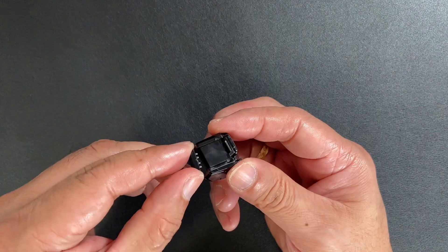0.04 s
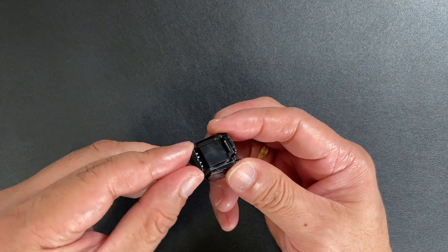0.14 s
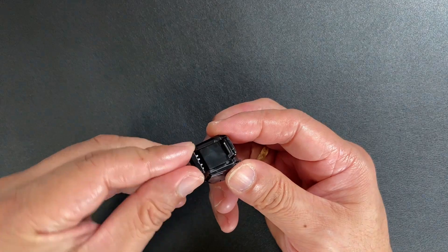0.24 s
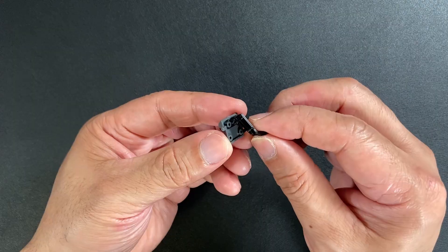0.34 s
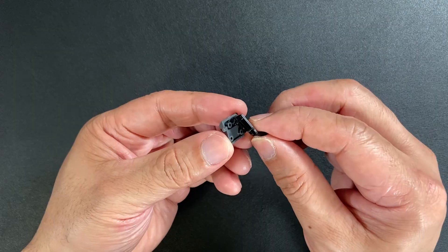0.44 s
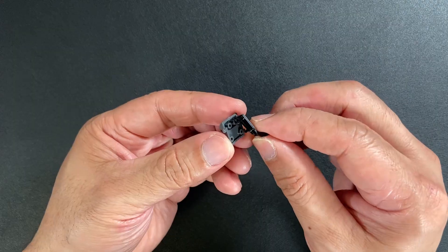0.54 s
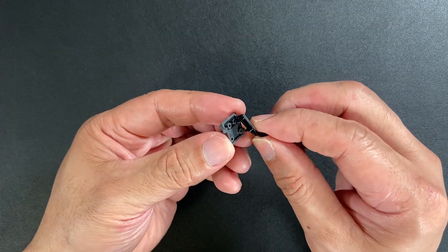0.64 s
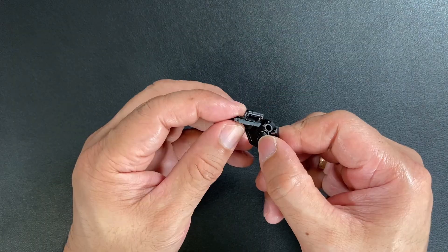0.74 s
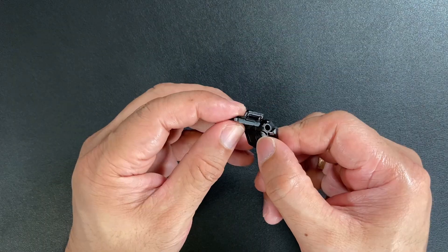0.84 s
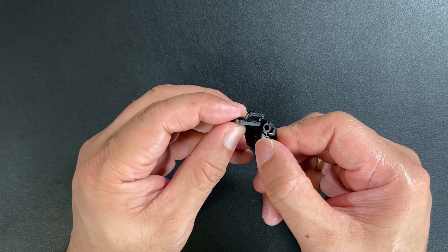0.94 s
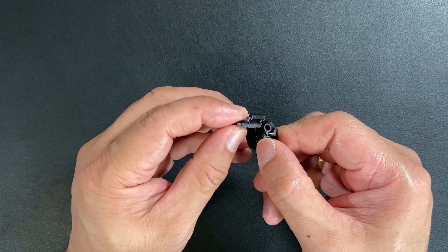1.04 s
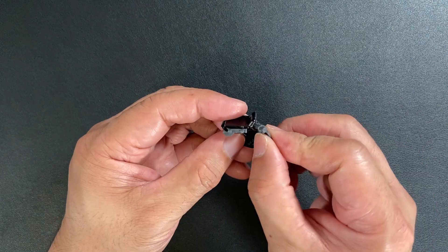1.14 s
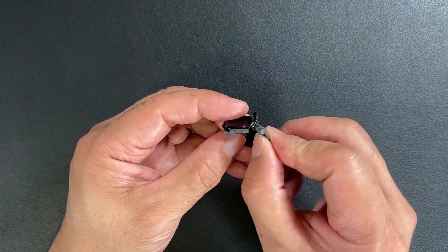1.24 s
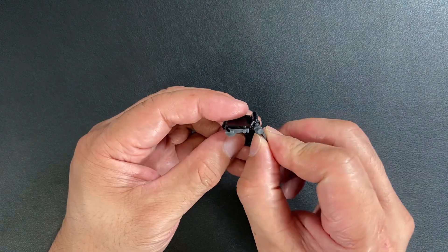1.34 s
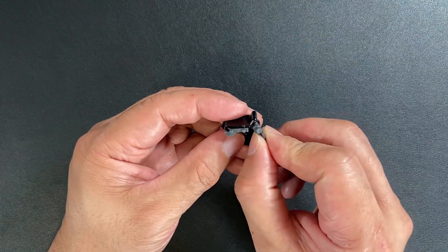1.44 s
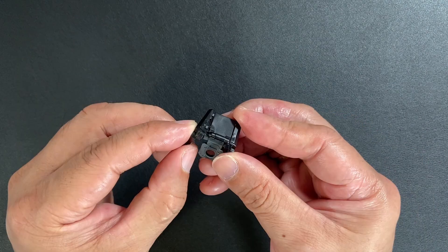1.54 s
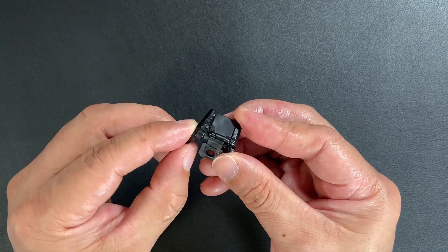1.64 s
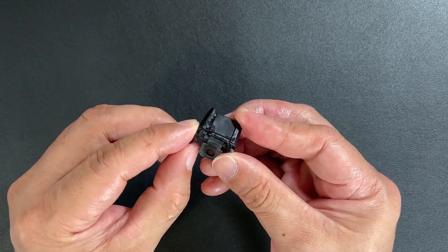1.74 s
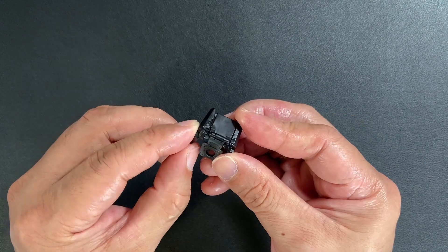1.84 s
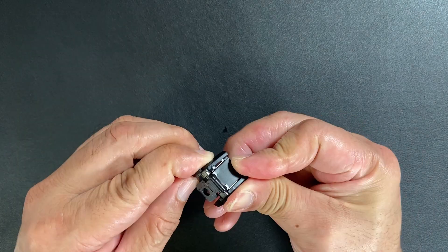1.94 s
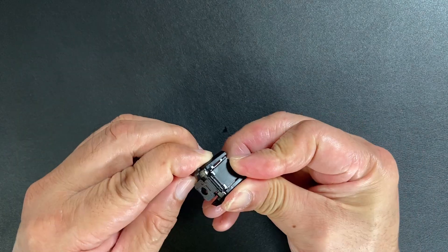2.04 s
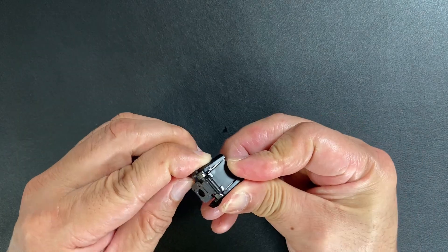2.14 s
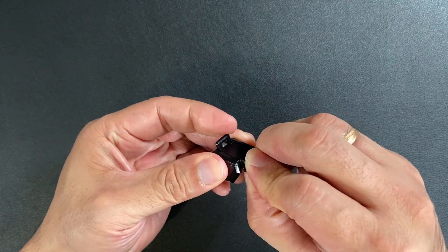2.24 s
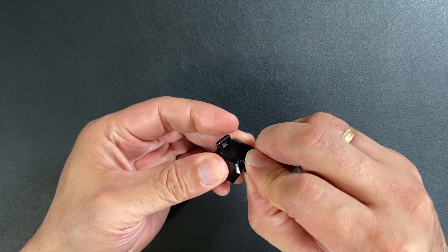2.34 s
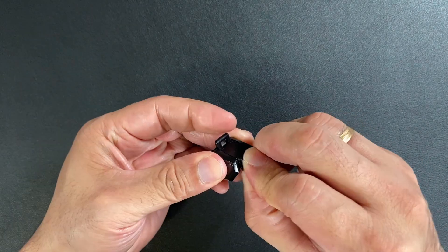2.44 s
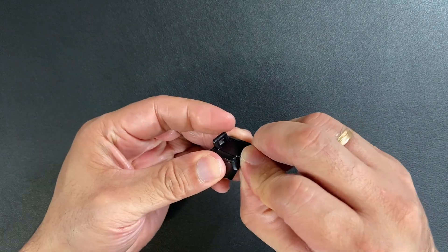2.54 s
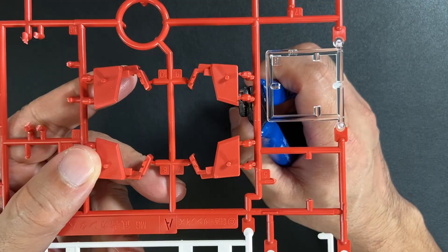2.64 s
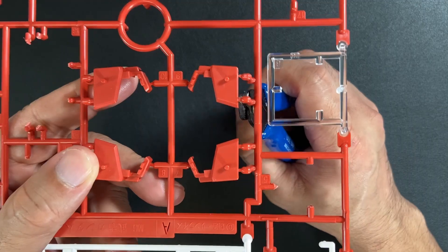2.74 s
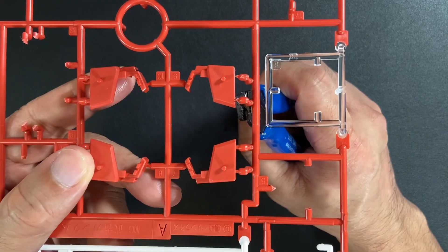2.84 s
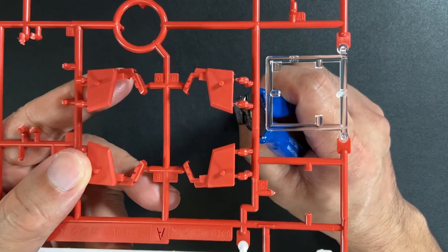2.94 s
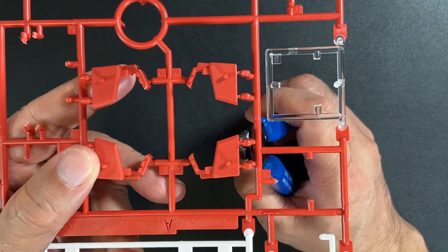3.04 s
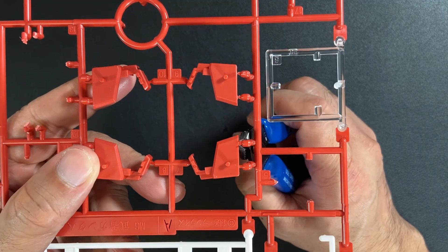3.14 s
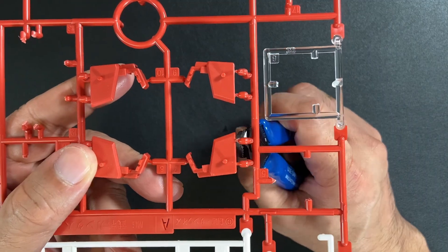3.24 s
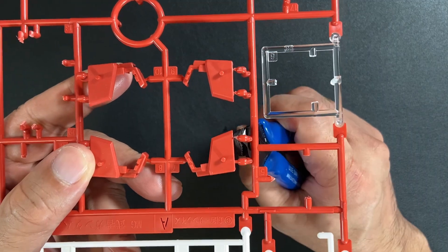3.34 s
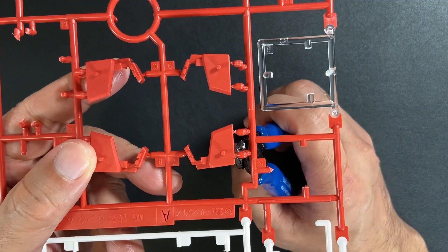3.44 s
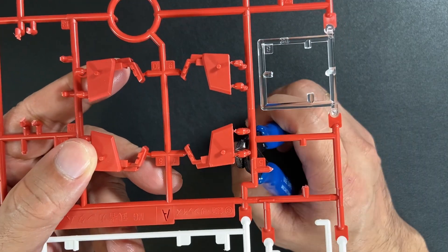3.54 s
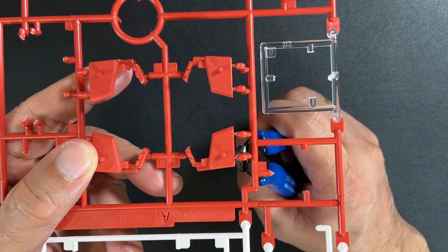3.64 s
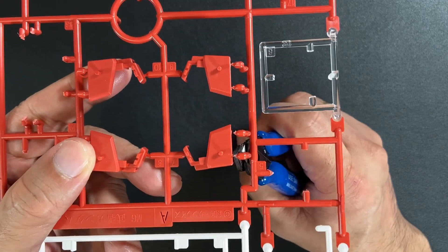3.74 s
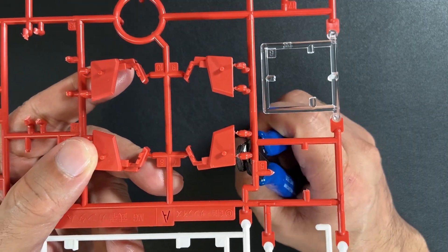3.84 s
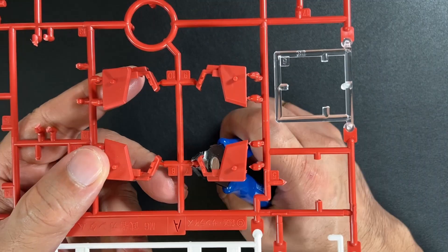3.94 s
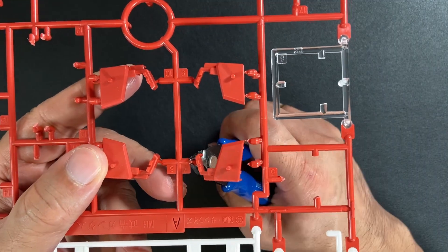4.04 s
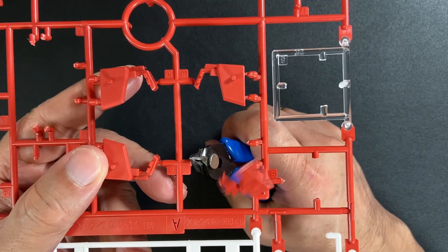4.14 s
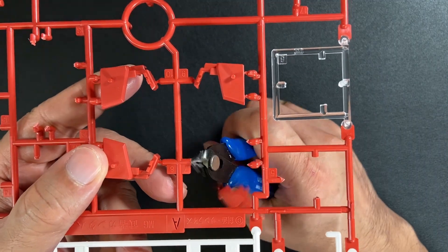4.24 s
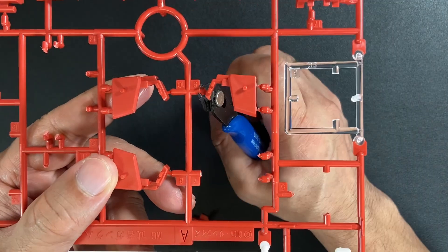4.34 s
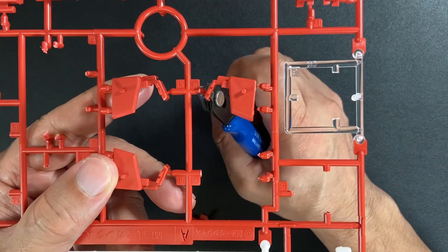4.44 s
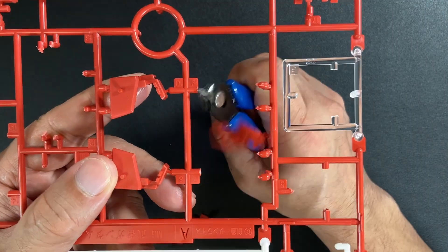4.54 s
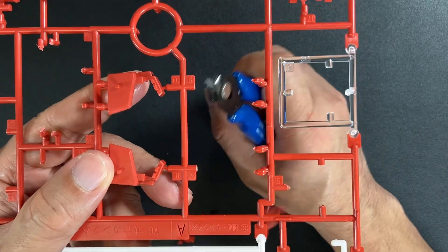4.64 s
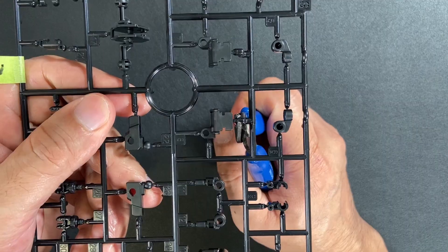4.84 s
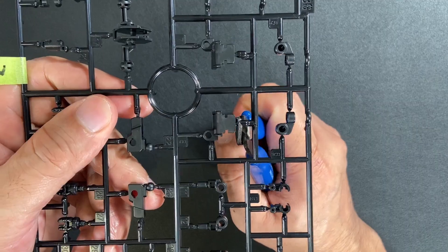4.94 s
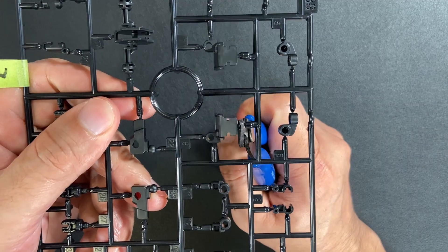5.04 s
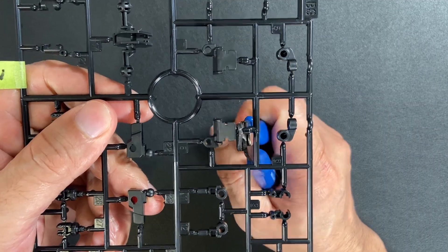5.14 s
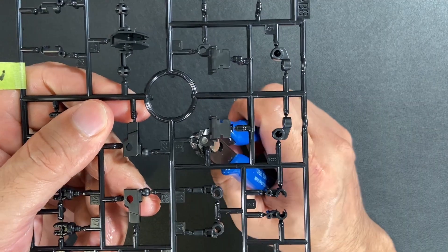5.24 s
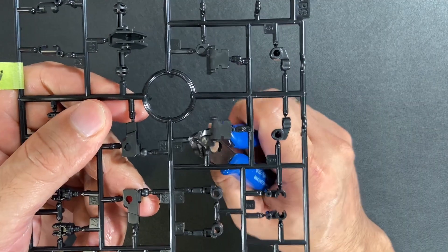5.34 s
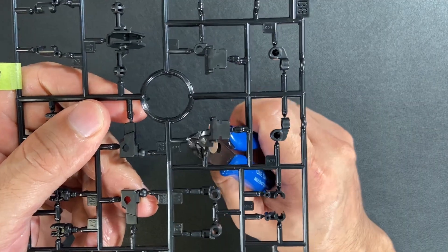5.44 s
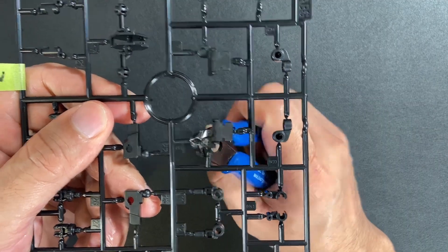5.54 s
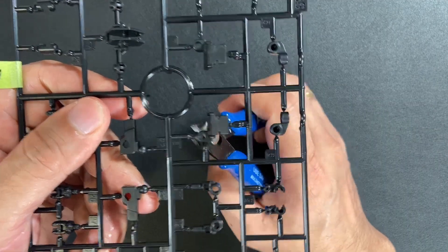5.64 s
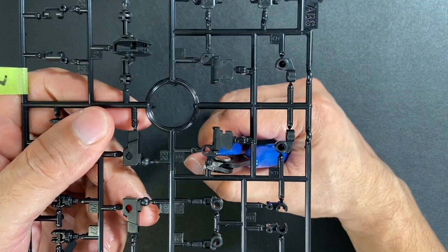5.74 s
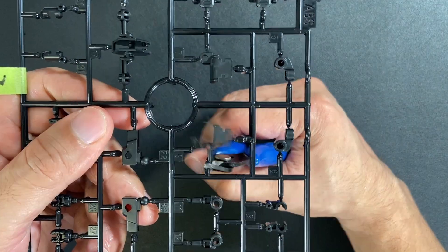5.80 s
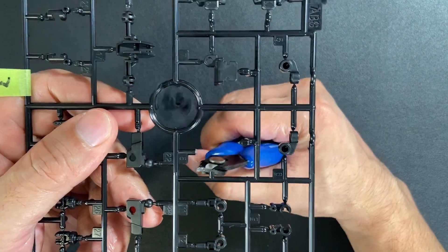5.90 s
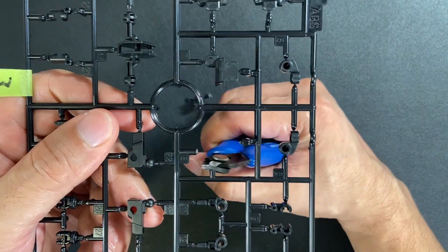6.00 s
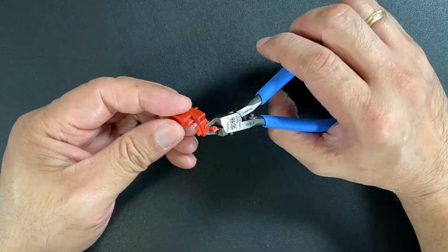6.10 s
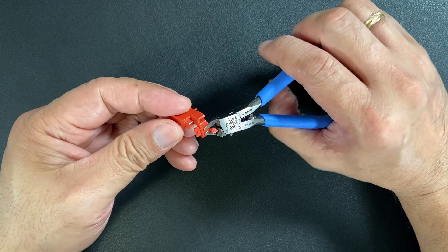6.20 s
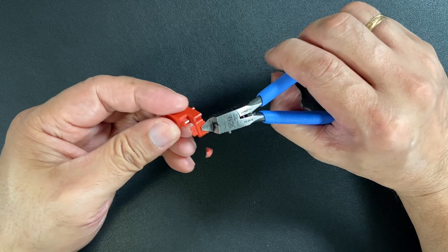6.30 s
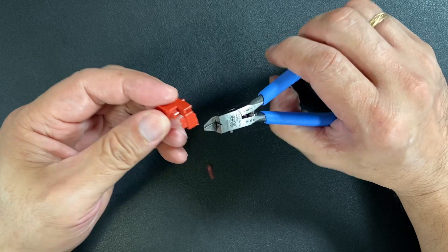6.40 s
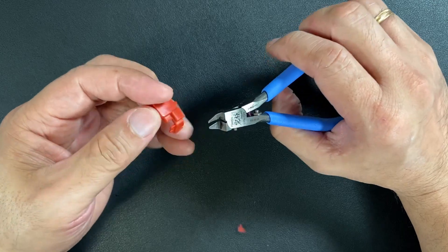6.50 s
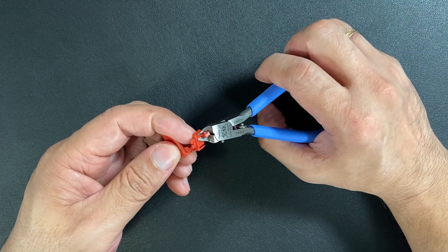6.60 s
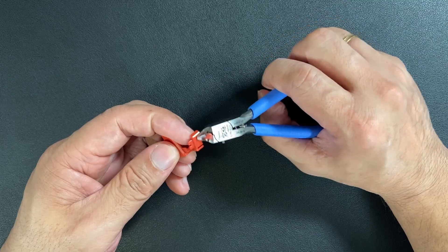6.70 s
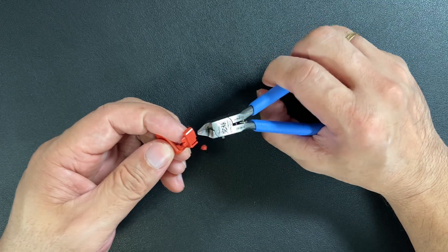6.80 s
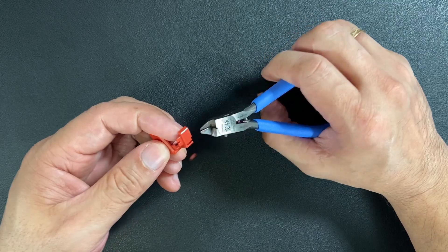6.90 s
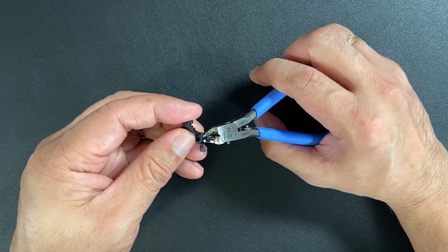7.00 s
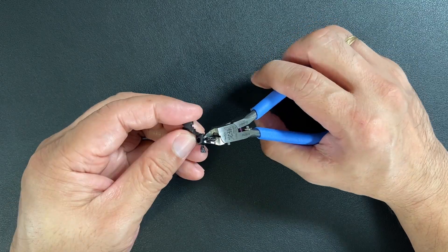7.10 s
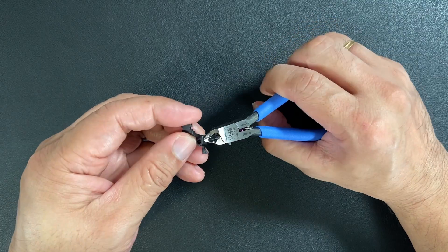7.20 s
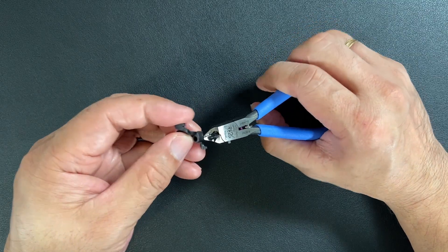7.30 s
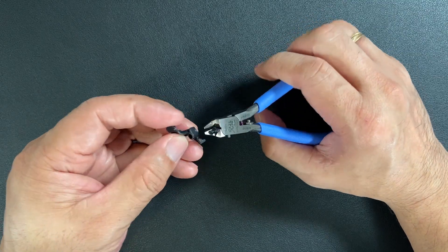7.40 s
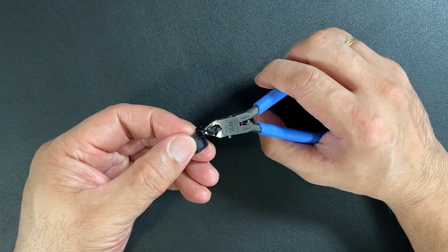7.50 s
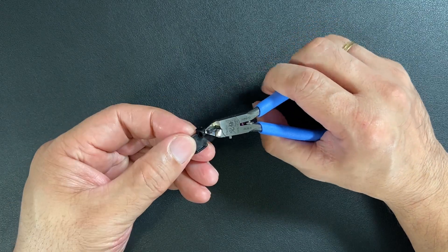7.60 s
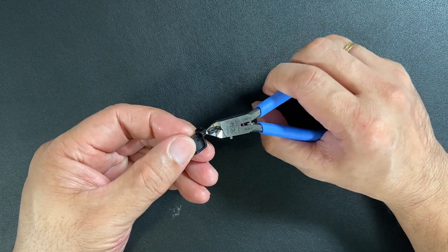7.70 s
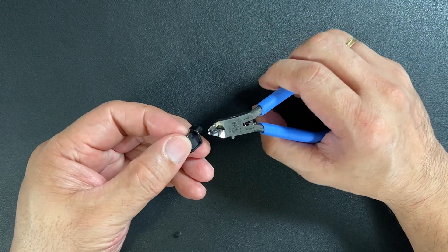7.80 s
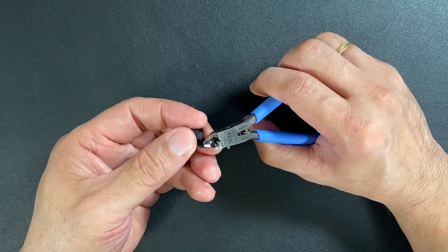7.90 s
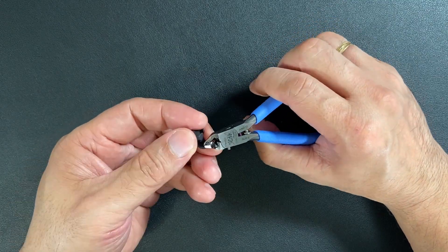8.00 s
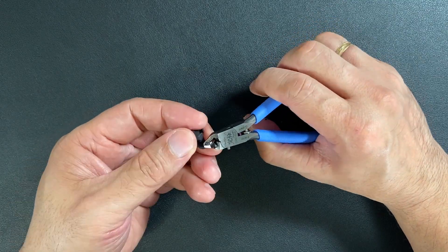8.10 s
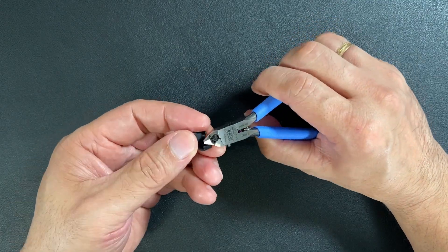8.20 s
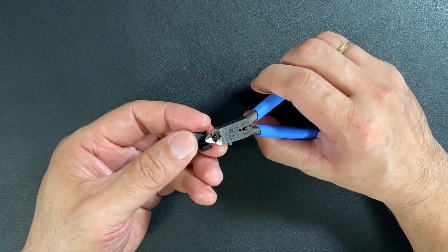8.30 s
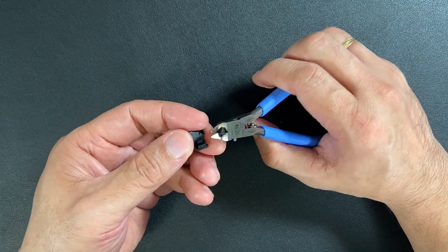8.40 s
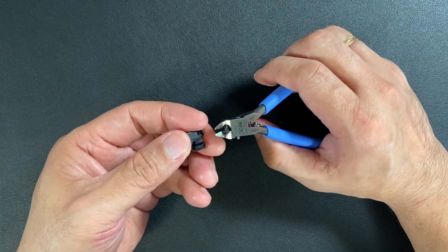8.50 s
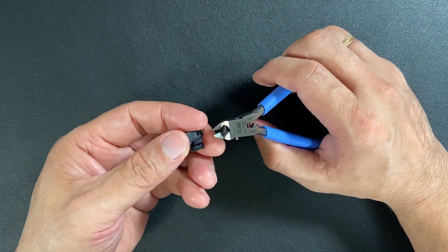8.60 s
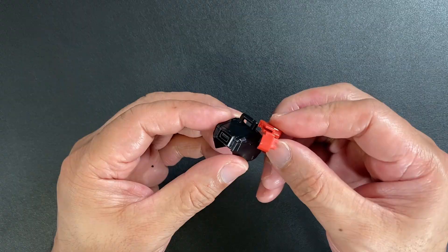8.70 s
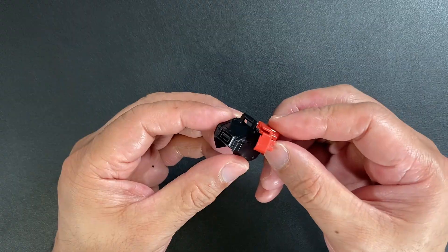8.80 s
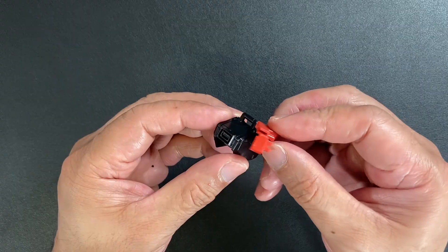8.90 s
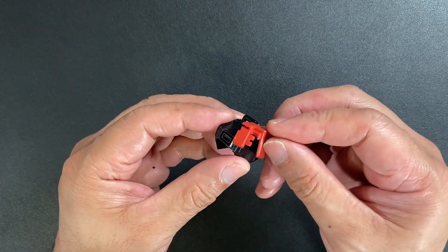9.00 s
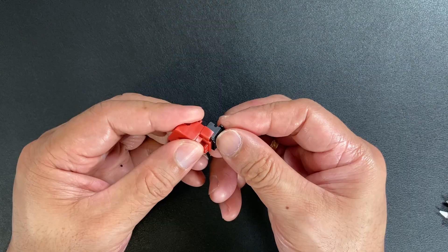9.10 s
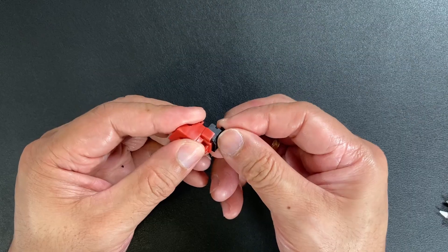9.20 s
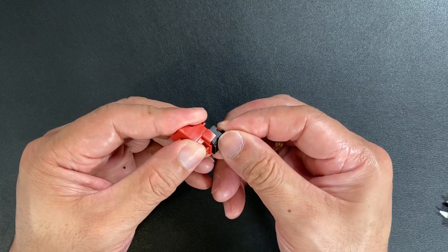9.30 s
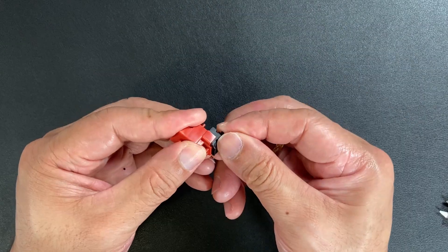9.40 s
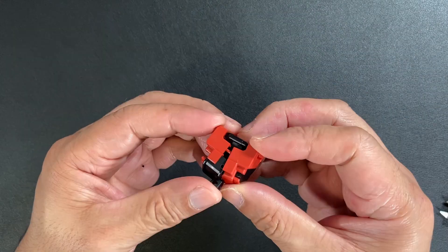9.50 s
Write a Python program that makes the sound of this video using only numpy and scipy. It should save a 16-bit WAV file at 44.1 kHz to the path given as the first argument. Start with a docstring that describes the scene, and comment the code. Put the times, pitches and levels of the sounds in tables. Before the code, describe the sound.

A close microphone at a desk in a quiet room with faint hum and low rumble; a soft low rush stops abruptly at 0.3 s. Small plastic parts click faintly at 0.1, 0.9, 1.3 and 1.7 s, then snap loudly at 2.0 with a weaker click at 2.4. From 2.8 cutters snip a plastic runner: bright cracks at 2.8, 3.2, a softer one at 3.6, then 4.0 with a freed part rattling until 4.2. A hard ringing break hits at 4.4, a dull drop at 4.7, the loudest, overloaded snip at 4.9, more at 5.3, 5.5 and 5.8. Light jaw taps, brief scrapes and low desk thumps fill between. Pieces drop around 6.1; quieter trimming clips run from 6.2 to 8.1, strongest near 6.8 and 8.1, with tiny offcuts ticking on the mat. After near silence, a sharp double snap at 8.9, then weaker clicks to 9.5.

```python
"""Snapping and snipping plastic parts

Close by, at a desk, fingers snap small plastic parts together and cutters snip parts off a runner.
Each click is a burst of fading noise plus the ringing tones of whatever was struck.
Freed parts rattle, offcuts bounce on a mat, rubbing is swelling noise and the desk thumps in low swings.
Underneath is a quiet room of filtered noise with rumble, hum and, at the start, a low rush.
Tails stop short at set times, and the loudest snips overload the input."""
import sys
import numpy as np
from scipy import signal
from scipy.fft import rfft, irfft, next_fast_len
from scipy.io import wavfile
from scipy.ndimage import uniform_filter1d

SR = 44100
rng = np.random.default_rng(int(sys.argv[2]) if len(sys.argv) > 2 else 0)


def store_wav(level_fs):
    """Save 16-bit WAV to argv[1]."""
    pcm = np.round(np.clip(np.atleast_2d(level_fs), -1, 1) * 32767)
    wavfile.write(sys.argv[1], SR, pcm.T.astype(np.int16))


N = 421139  # length in samples

# In the click tables, f is the strongest ring; body and ringing are levels relative to the click.
# Parts pressed together: t/s, level/dB, f/Hz, body/dB, ringing/dB
SNAPS = [(0.0832, -23.5, 5130, -28, -22), (0.1543, -35, 5640, -11, -24), (0.8756, -33.5, 7450, -15.5, -19),
         (1.289, -42.5, 7600, -18, -15), (1.672, -22.5, 5560, -14.5, -14.5), (2.028, 2.5, 5260, -6, -23),
         (2.4148, -21.5, 5660, -11.5, -62), (8.9081, -10, 8800, -23, -13), (8.9132, -10, 5200, -41.5, -25),
         (9.0042, -19, 6300, -24.5, -27), (9.2576, -44.5, 6560, -1, -23), (9.2794, -27, 706, 2.5, -24.5),
         (9.541, -41, 4500, -9.5, -19.5)]
# Cutters snipping the runner: t/s, level/dB, f/Hz, body/dB, ringing/dB
SNIPS = [(2.8005, -4.5, 5640, -27, -2), (3.2026, 4, 7000, -28.5, -8), (3.6132, -16, 4860, -8.5, -7),
         (4.0223, -6, 7760, -4.5, -12.5), (4.9322, 10, 8230, -16.5, -15),
         (5.2574, -18.5, 3370, -0.5, -12.5), (5.3163, -1.5, 2944, -13.5, -13.5),
         (5.5258, -1.16, 8170, -17.5, -10), (5.7862, -10.5, 3450, -2.1, -13.5),
         (5.8587, -24, 8200, -14.5, -17), (5.8646, -18, 8200, -17, -6.5)]
# A freed part rattling: t/s, level/dB, f/Hz, body/dB, ringing/dB
RATTLES = [(4.0317, -6.5, 10100, -30, -6), (4.0434, -3.5, 7360, -20, -11.5), (4.0926, -20.5, 6900, -8, -14),
           (4.0974, -21, 5810, -15, -9), (4.149, -19, 7320, -17, -2.5), (4.1644, -21.5, 3400, -24, -11),
           (4.1714, -30.5, 3740, -13, 12.1), (4.1984, -18.5, 10140, -14, -5),
           (4.2058, -21.5, 7440, -20, -2.5)]
# Breaks that set a second part ringing: t/s, level/dB, f/Hz, body/dB, ringing/dB
BREAKS = [(4.4366, 5, 8400, -12, -2), (4.501, -34, 2200, -9, 1.5)]
# Tinks of a small part: t/s, level/dB, f/Hz, body/dB, ringing/dB
TINKS = [(5.805, -18.5, 7600, -23, -21), (5.8801, -32, 3330, -34, -6), (5.9085, -31, 5400, -11, -13)]
# Trimming cuts: t/s, level/dB, f/Hz, body/dB, ringing/dB
TRIMS = [(6.2027, -22.5, 7940, -27, -10), (6.3555, -21, 2440, -24, -26), (6.6623, -19.5, 7630, -26, -20),
         (6.8414, -11.5, 7800, -8, -57), (7.1386, -27, 7810, -21, 5.5), (7.5761, -21, 7470, -16, 0.5),
         (7.6143, -39.5, 6850, -23, -19), (7.7935, -15, 1404, -14.5, -31.5), (8.1, -12.5, 7260, -37, -35)]
# Pieces dropped on the mat: t/s, level/dB, f/Hz, body/dB, ringing/dB
DROPS = [(4.6832, -17.5, 448, -4.5, -3.5), (4.697, -25, 2200, 7.5, -24.5), (6.0355, -19, 920, 5.5, -12.5),
         (6.1094, -25, 980, 4.5, -15), (6.116, -23, 2580, 0.5, -17), (6.1346, -44, 1710, 11, -15)]
# Offcuts bouncing on the mat: t/s, level/dB, f/Hz
BOUNCES = [(6.2805, -47, 3150), (6.4047, -27, 8500), (6.4591, -31, 4040), (6.5164, -33.5, 2550),
           (6.5237, -40.5, 2500), (6.549, -40, 2530), (6.5567, -37.5, 3740), (6.57, -45, 2310),
           (6.728, -50, 3000), (6.743, -41, 6800), (6.8838, -37, 2380), (6.9062, -33.5, 2380),
           (6.933, -40, 1880), (6.9595, -36.5, 1910), (7.849, -34.5, 1100), (7.866, -44.5, 1785),
           (7.888, -28, 7550), (7.896, -33.5, 2680), (7.9221, -37, 2460), (7.93, -44, 2660)]
BOUNCE_BODY_DB, BOUNCE_RING_DB = -12, -25
# Jaw tips meeting the runner: t/s, level/dB, f/Hz
TOUCHES = [(3.025, -33.5, 3630), (3.129, -49, 4970), (3.4026, -39, 5800), (3.548, -42.5, 1870),
           (3.8103, -41, 5570), (3.961, -47.5, 7360), (4.368, -53, 2200), (4.776, -54, 6500),
           (4.805, -50.5, 1488), (4.841, -43, 7640), (4.869, -45, 4737), (4.883, -48.5, 7200),
           (4.9034, -44, 7500), (5.13, -48, 1810), (5.1624, -47, 5970), (5.1849, -41.5, 1013),
           (5.229, -53, 3480), (5.3, -47.5, 5000), (5.51, -51, 4210), (5.632, -51, 1920),
           (5.659, -56, 1900), (5.7255, -41, 2200), (5.758, -49, 3630)]
TOUCH_BODY_DB, TOUCH_RING_DB = -9, -15

# Tones (modes) of each struck object; t60 is the time to fade by 60 dB.
# Shell of the snapped parts: f/Hz, level/dB, t60/s
SHELL_MODES = [(2330, 1.5, 0.045), (4200, -5, 0.066), (6000, -9, 0.13), (10400, -17.5, .04),
               (12410, -7, 0.037)]
# Plastic runner: f/Hz, level/dB, t60/s
RUNNER_MODES = [(1007, -23, .15), (1850, -13, .1), (2186, -11, .075), (2700, -13, .07), (3570, -2, .065),
                (3876, -7, .07), (4330, -8, .06), (5000, -10, .06), (5674, -6, .075), (6500, -12, .06),
                (7144, -8, .055), (7540, -1, .045), (8165, -6, .055), (9426, -18, .06), (10550, -18, .06),
                (12790, -20, .06)]
# Loose, rattling part: f/Hz, level/dB, t60/s
LOOSE_PART_MODES = [(2035, -4, .26), (2692, -6, .17), (3542, -1, .11), (4958, -2, .09), (5873, -5, .09),
                    (7364, -4, .04), (7865, -7, .09), (8974, -1, .1), (10360, -1, .05), (12570, -4, .035),
                    (14300, -4, .04)]
# Second part: f/Hz, level/dB, t60/s
SECOND_PART_MODES = [(850, -19, .22), (2200, -22, .25), (3871, -9, .09), (4247, -3, .07), (5184, -11, .12),
                     (5809, -1, .07), (6961, -1, .07), (7402, -6, .08), (8409, -1, .075), (9265, -5, .12),
                     (11590, -10, .08), (12230, -9, .06)]
# Small part: f/Hz, level/dB, t60/s
SMALL_PART_MODES = [(3470, -4, 0.083), (5530, 1, 0.019), (7300, -21, .08), (8250, -3.5, 0.047),
                    (10700, -1, 0.033), (11900, -8, .06), (14800, -11, .06)]
# Cutter jaws: f/Hz, level/dB, t60/s
JAW_MODES = [(1670, -1, .04), (4000, -20, .02), (7800, -16, .015)]
# Desk mat: f/Hz, level/dB, t60/s
MAT_MODES = [(376, 3, 0.09), (614.6, 12, 0.082), (1255, 6, .07), (2270, -16, 0.045), (3430, 2, 0.038)]

# Blades chewing into plastic and fingers rubbing it: start t/s, end t/s, level/dB before the swell, f/Hz
SCRAPES = [(2.628, 2.685, -61.5, 3700), (2.97, 3.009, -64, 3500), (3.012, 3.041, -42.5, 3360),
           (3.364, 3.43, -64, 4730), (3.54, 3.62, -61, 4620), (3.794, 3.842, -52, 4850),
           (4.216, 4.342, -59.5, 5700), (4.398, 4.438, -59, 4200), (4.49, 4.593, -63, 6000),
           (4.595, 4.696, -59, 4470), (5.109, 5.2, -61.5, 2900), (5.777, 5.785, -48, 3000),
           (6.176, 6.206, -57, 6019), (6.467, 6.51, -58, 6880), (6.642, 6.665, -59, 7500),
           (7.121, 7.139, -58, 7900), (8.893, 8.928, -51.5, 5700)]
# Thumps carried by the desk: t/s, level/dB before a shared 3 dB lift, f/Hz
THUMPS = [(2.029, -42.5, 43.1), (2.412, -35.5, 26.9), (2.648, -41, 46.3), (2.804, -25.5, 40.5),
          (3.024, -43.5, 168.4), (3.2, -22, 42.5), (3.408, -32.5, 43.1), (3.614, -32, 53),
          (3.809, -40, 48.4), (4.021, -15.5, 53), (4.436, -13.5, 52), (4.685, -29.5, 152),
          (4.895, -36, 26.85), (4.934, -19, 48.3), (5.178, -32, 56.2), (5.259, -40.5, 48.4),
          (5.314, -18, 52.7), (5.525, -34, 35.4), (5.724, -34.5, 113), (5.785, -16.5, 42.5),
          (6.033, -32.5, 128.2), (6.2, -33.5, 53.6), (6.661, -33.5, 40.6), (7.136, -36, 26.78),
          (7.576, -29.5, 45.9), (8.103, -38.5, 56.8)]
# Rumble of desk and building over time: t/s, level/dB
RUMBLE = [(0.0, -51), (9.04, -52.5), (9.55, -46)]
RUMBLE_HZ, RUMBLE_WIDTH_HZ = 37.87, 13
# Shape of the room tone: f/Hz, relative level/dB
AIR = [(82, -34), (140, -5), (264, -8), (370, -24), (417, -11), (561, -23), (644, -19.5), (2120, -25.5),
       (15100, -29), (16000, -30.5)]
AIR_DB = -70.5
# Shape of a far low rush, heard up to the first cut: f/Hz, relative level/dB
RUSH = [(59, -20), (100, -6.5), (266, -7), (341, -15), (445, -8), (602, -23.5), (800, -16.5), (1320, -26),
        (1910, -22), (7000, -46), (9100, -66.5), (15400, -120)]
RUSH_DB = -57.5
# Hums: f/Hz, level/dB, width/Hz of each of two filter passes
HUM = [(65, -69, 15), (119, -66.5, 12), (248, -74.5, 34), (590, -88.5, 9.1), (15500, -85, 25)]
# Moments where tails stop short: t/s
CUTS = [0, .34, 3.045, 4.338, 4.582, 5.206, 6.14, 6.575, 7.94, 9.55]
# How fast the room's echo fades: f/Hz, t60/s
ROOM = [(200, 0.2), (1000, 0.15), (2000, 0.165), (5500, 0.15), (8000, 0.14), (15000, 0.125)]
ROOM_DB = -16

# How each kind of click cracks. Thud is relative to the body, edge and fizz to the click.
# Growth is the change of crack length per dB of ringing; reach is how fast modes weaken away from f.
# Snap: thud/dB, edge/dB, fizz/dB, crack t60/s at 0 dB ringing, growth/(dB/dB), reach/(dB/octave), flutter
SNAP_KIND = (-12, 0.5, -5, 0.0108, 0.0259, 3.5, 0.5)
# Snip: the same seven columns and units as the snap
SNIP_KIND = (-8, -5.5, -8, 0.1234, 1.11, 1.7, 0.38)
# Rattle: the same seven columns and units
RATTLE_KIND = (-7, -11, -21, .019, -.3, 5.7, .1)
# Break: the same seven columns and units
BREAK_KIND = (-3.5, -.6, -8, .036, -.1, 3, .38)
# Tink: the same seven columns and units
TINK_KIND = (-10.5, -13.5, -10, 0.56, 3.1, 9, -2)
# Trim: the same seven columns and units
TRIM_KIND = (-26, -6, -15.5, 0.0283, 0.19, 9.3, 0.6)
# Drop: the same seven columns and units
DROP_KIND = (0, -8.5, -13, 0.1464, 1.93, 5, 1.8)
# Bounce: the same seven columns and units
BOUNCE_KIND = (-9.5, -17.5, -28, 0.4457, 1.65, 11, 0.8)
# Touch: the same seven columns and units
TOUCH_KIND = (0, -9, -10.5, 0.18, 1, 2.5, 1.14)
FIZZ_PER_BODY = -0.34  # dB per dB: a stronger dull body means less fizz
CROWDED_HZ = 3420  # below this the modes stand apart and flutter less
EDGE_HZ = 16300  # upper limit of the input


def amp(db):
    """Turns decibels into a plain multiplier."""
    return 10 ** (np.asarray(db) / 20)


def evened(x):
    """Scales a sound to an average (rms) level of 1."""
    return x / np.sqrt(np.mean(x ** 2) + 1e-20)


def peaked(x):
    """Scales the loudest millisecond to the level of a sine of height 0.56."""
    loudest = uniform_filter1d(x ** 2, size=44).max()
    return 0.56 * x / np.sqrt(2 * loudest + 1e-20)


def read(points, hz):
    """Reads a table between its points, along a logarithmic pitch scale."""
    f, value = np.transpose(points)
    return np.interp(np.log(hz + 1), np.log(f + 1), value)


def add(mix, s, sound):
    """Places a sound at s seconds; the next cut fades it out within two milliseconds."""
    following = min(np.searchsorted(CUTS, s, "right"), len(CUTS) - 1)
    end = CUTS[following]
    part = mix[round(s * SR):round(end * SR)][:len(sound)]
    left = end - s - np.arange(len(part)) / SR
    part += sound[:len(part)] * np.clip(left / 0.002, 0, 1)


def resonate(x, hz, width):
    """Lets one pitch ring, with gain near 1; a wider resonance dies sooner."""
    r = np.exp(-np.pi * width / SR)
    return 2 * signal.lfilter([1 - r], [1, -r * np.exp(2j * np.pi * hz / SR)], x).real


def coloured(points):
    """Steady noise with the given spectrum, at rms 1."""
    size = next_fast_len(N)
    hz = np.fft.rfftfreq(size, 1 / SR)
    spectrum = rfft(rng.standard_normal(size)) * amp(read(points, hz))
    return evened(irfft(spectrum)[:N])


def background():
    """Room tone, narrow hums, lumpy rumble and the opening rush, all made from filtered noise."""
    t = np.arange(N) / SR
    out = amp(AIR_DB) * coloured(AIR)
    for hz, db, width in HUM:
        once = resonate(rng.standard_normal(N), hz, width)
        out += amp(db) * evened(resonate(once, hz, width))
    low = resonate(rng.standard_normal(N), RUMBLE_HZ, RUMBLE_WIDTH_HZ)
    low = resonate(low, RUMBLE_HZ, 40)
    out += amp(np.interp(t, *np.transpose(RUMBLE))) * evened(low)
    rush_fade = np.clip((CUTS[1] - t) / 0.0062, 0, 1)
    return out + amp(RUSH_DB) * coloured(RUSH) * rush_fade


def clicks(table, modes, kind):
    """Micro-cracks make a broad ring and four noise bands; the object's modes ring strongest near f."""
    thud_db, edge_db, fizz_db, crack_s, growth, reach_db, blur = kind
    out, t = np.zeros(N), np.arange(SR // 4) / SR
    edges = [(250, 1100), (1300, 2800), (3000, 7000), (8000, 15500)]  # Hz: thud, body, edge, fizz
    bands = [signal.butter(2, e, "band", fs=SR, output="sos") for e in edges]
    slower = [2.8, 1.2, 0.56, 0.15]  # low bands die later
    f, level_db, t60 = np.transpose(modes)[:, :, None]
    blur = blur * np.minimum(f / CROWDED_HZ, 1)
    for s, db, hz, body_db, ring_db in table:
        crack = crack_s * amp(growth * ring_db)
        noise, turn = rng.standard_normal(len(t)), rng.random(f.shape)
        noise *= 1 - np.exp(-t / 0.0005)
        noise[8] += 4  # the first release is the hardest
        fading = noise * amp(-60 * (t / crack) ** 0.98)
        sound = amp(-0.5) * peaked(resonate(fading, hz, 0.14 * hz + 800))
        parts_db = [body_db + thud_db, body_db, edge_db, fizz_db + FIZZ_PER_BODY * body_db]
        for band, part_db, k in zip(bands, parts_db, slower):
            fading = noise * amp(-60 * (t / (k * crack)) ** 1.33)
            sound += amp(part_db) * peaked(signal.sosfilt(band, fading))
        # crowds of close modes make each tone flutter
        flutter = evened(uniform_filter1d(rng.standard_normal((len(f), len(t))), size=90))
        near_db = level_db - reach_db * abs(np.log2(f / hz))
        tones = np.sin(2 * np.pi * (f * t + turn)) * amp(near_db - 60 * t / t60)
        ring = ((1 - blur + blur * flutter) * tones).sum(0)
        sound += amp(ring_db) * peaked(ring * (1 - np.exp(-t / 0.00054)))
        add(out, s + 0.00073, amp(db) * sound)
    return out


def snaps():
    """Parts pressed together crack and ring their shell."""
    return clicks(SNAPS, SHELL_MODES, SNAP_KIND)


def room(x):
    """A noisy echo whose bands die at their own speeds; each cut stops whatever still rings."""
    hz, t, z = signal.stft(rng.standard_normal(SR // 2), SR, nperseg=128)
    fading = z * amp(-60 * t / read(ROOM, hz)[:, None])
    tail = signal.istft(fading, SR, nperseg=128)[1]
    tail *= np.clip(np.arange(len(tail)) / (0.003 * SR), 0, 1) / np.linalg.norm(tail)
    at = np.round(np.multiply(CUTS, SR)).astype(int)
    pieces = [signal.fftconvolve(x[a:b], tail)[:len(x[a:b])] for a, b in zip(at, at[1:])]
    return np.resize(np.concatenate(pieces), N)


def thumps():
    """The desk swings a few low, uneven cycles; its higher tones die sooner than its low shake."""
    out, t = np.zeros(N), np.arange(SR // 2) / SR
    for s, db, hz in THUMPS:
        shake = rng.standard_normal(len(t))
        low = evened(resonate(resonate(shake, 42, 30), 42, 30))
        high = evened(resonate(resonate(shake, 100, 96), 100, 96))
        swing = np.sin(2 * np.pi * hz * t) * amp(-60 * t / 0.05)
        swing += 0.38 * low * amp(-60 * t / 0.35)
        swing += 0.3 * high * amp(-60 * t / 0.12)
        add(out, s, amp(db + 3.0) * swing * (1 - np.exp(-t / 0.003)))
    return out


def scrapes():
    """Dense tiny slips of uneven strength swell through each stroke."""
    out = np.zeros(N)
    for start, end, db, hz in SCRAPES:
        count = max(round((end - start) * SR), 64)
        strength = amp(0.85 * rng.exponential(1, SR // 3))
        slips = (rng.standard_normal(SR // 3) * strength)[:count]
        width = hz * np.clip(24 * (end - start), 0.08, 0.85)  # short slips squeak, long ones hiss
        colour = evened(resonate(slips, hz, width))
        swell = signal.windows.tukey(count, 0.6) * np.linspace(0.4, 1.3, count)
        add(out, start, amp(db) * colour * swell)
    return out


def snips():
    """Cutters crack through the plastic and the runner rings."""
    return clicks(SNIPS, RUNNER_MODES, SNIP_KIND)


def touches():
    """Jaw tips tap the runner, so it rings lightly."""
    rows = [row + (TOUCH_BODY_DB, TOUCH_RING_DB) for row in TOUCHES]
    return clicks(rows, RUNNER_MODES, TOUCH_KIND)


def rattles():
    """A freed part knocks and rings at its own many tones."""
    return clicks(RATTLES, LOOSE_PART_MODES, RATTLE_KIND)


def breaks():
    """Sharp cracks set a second part ringing."""
    return clicks(BREAKS, SECOND_PART_MODES, BREAK_KIND)


def drops():
    """Pieces land on the mat, which answers with short, dull tones."""
    return clicks(DROPS, MAT_MODES, DROP_KIND)


def tinks():
    """A small part clicks and rings with mostly high tones."""
    return clicks(TINKS, SMALL_PART_MODES, TINK_KIND)


def trims():
    """Trimming cuts crack while the cutter jaws ring very briefly."""
    return clicks(TRIMS, JAW_MODES, TRIM_KIND)


def bounces():
    """Light offcuts hop on the mat, all with the same share of body and ringing."""
    rows = [row + (BOUNCE_BODY_DB, BOUNCE_RING_DB) for row in BOUNCES]
    return clicks(rows, MAT_MODES, BOUNCE_KIND)


def scene():
    """Adds the room's echo to the hand sounds, then the desk thumps and the background."""
    hands = snaps() + scrapes() + snips() + touches() + rattles()
    hands += breaks() + drops() + tinks() + trims() + bounces()
    return (hands + amp(ROOM_DB) * room(hands) + thumps() + background())[None]


def record(dry):
    """The input flattens peaks at full scale, then a filter removes the highest treble."""
    taps = signal.firwin(255, EDGE_HZ, window=("kaiser", 8), fs=SR)[None]
    overloaded = np.clip(dry, -1, 1)
    return np.clip(signal.oaconvolve(overloaded, taps, "same"), -1, 1)


dry = scene()
out = record(dry)
store_wav(out)
```